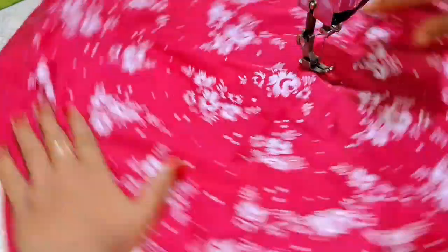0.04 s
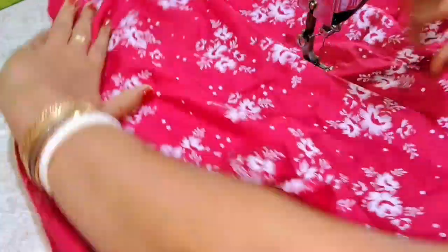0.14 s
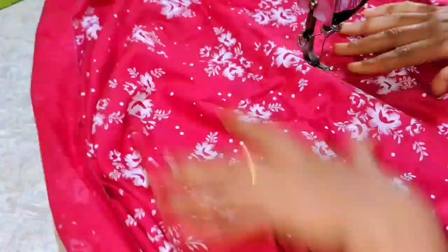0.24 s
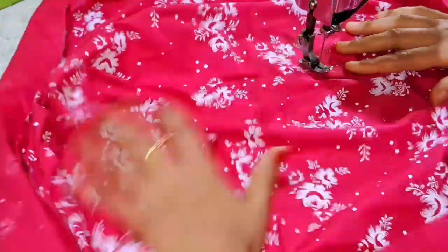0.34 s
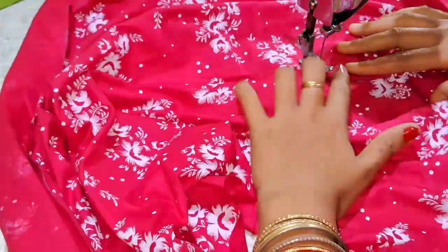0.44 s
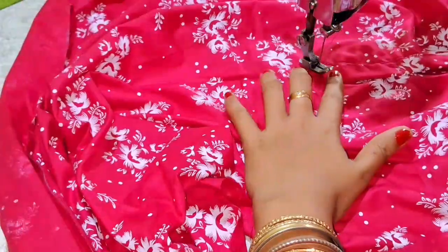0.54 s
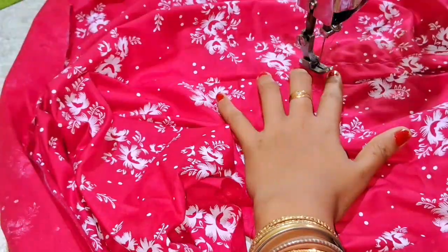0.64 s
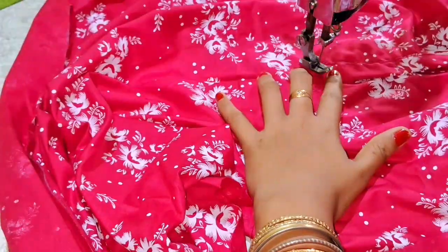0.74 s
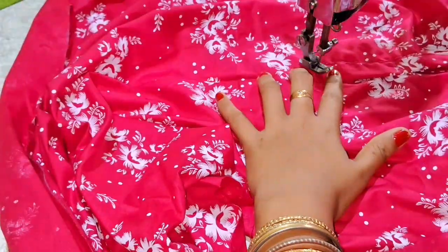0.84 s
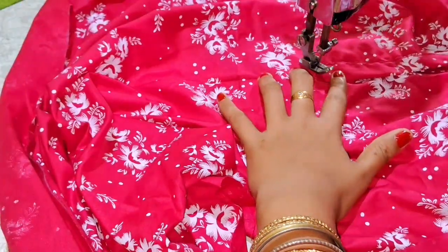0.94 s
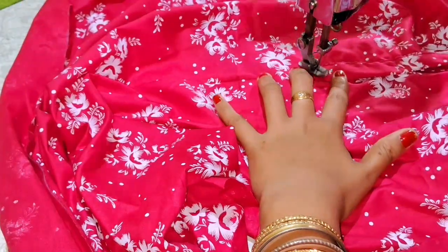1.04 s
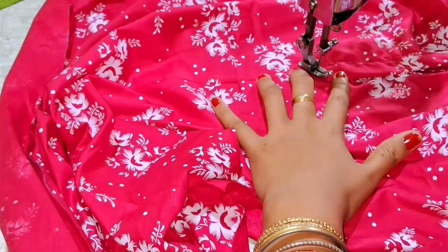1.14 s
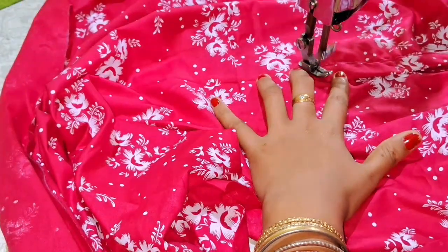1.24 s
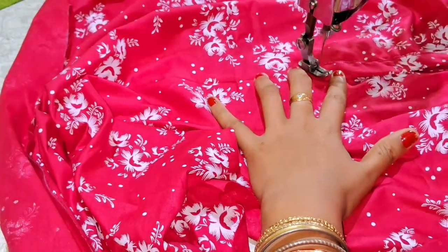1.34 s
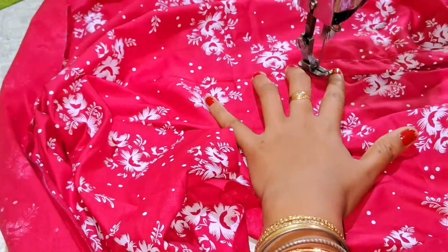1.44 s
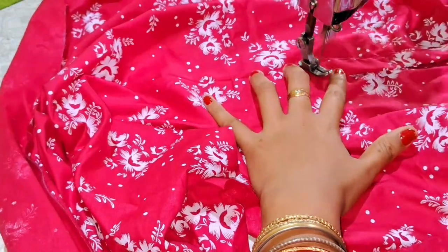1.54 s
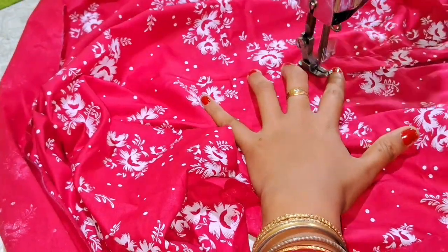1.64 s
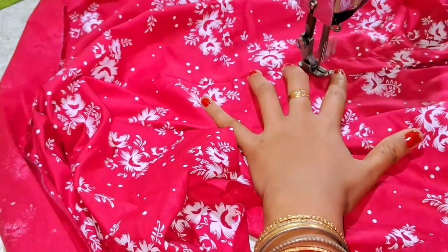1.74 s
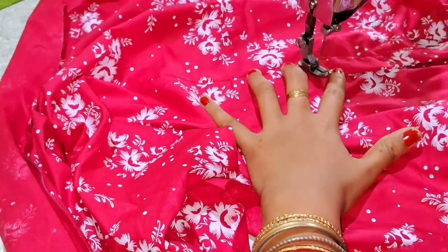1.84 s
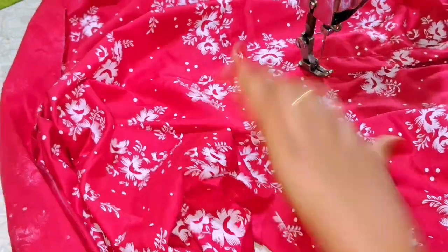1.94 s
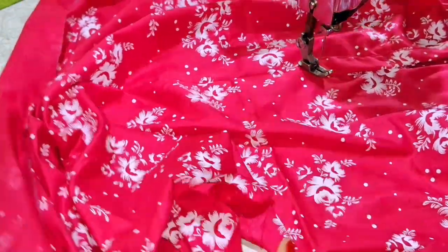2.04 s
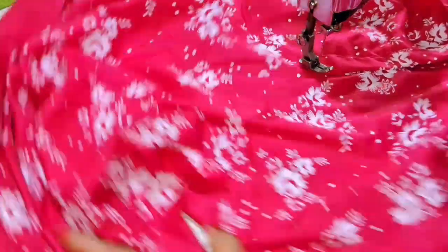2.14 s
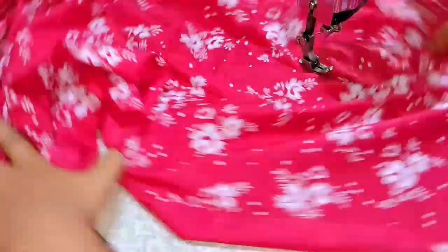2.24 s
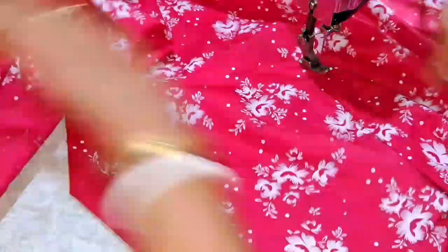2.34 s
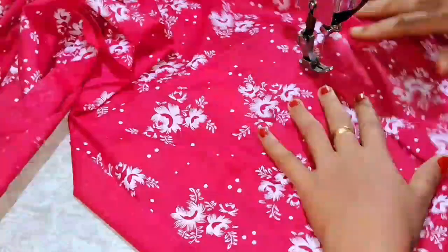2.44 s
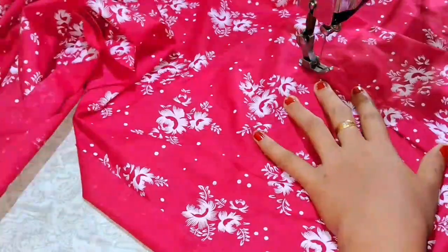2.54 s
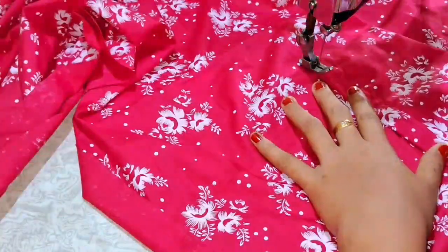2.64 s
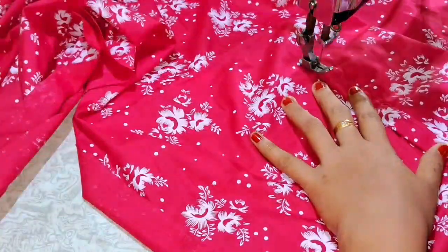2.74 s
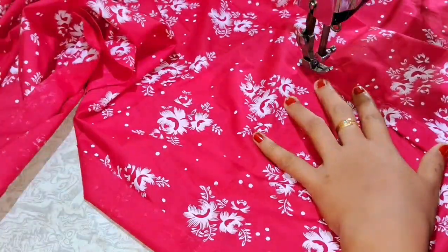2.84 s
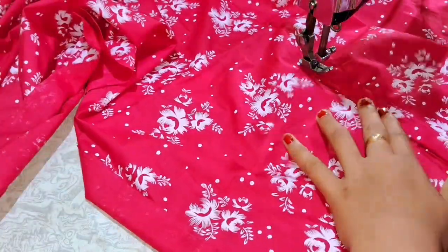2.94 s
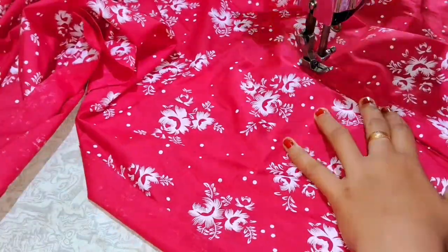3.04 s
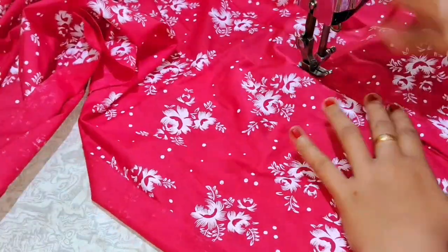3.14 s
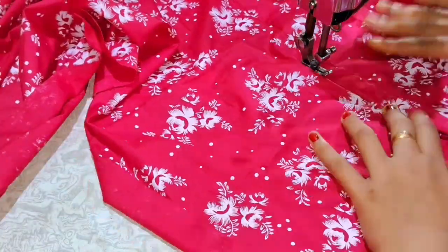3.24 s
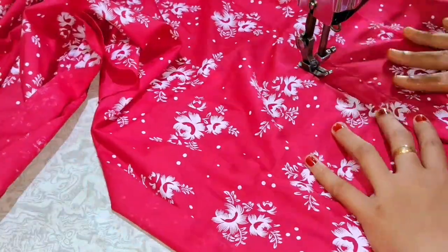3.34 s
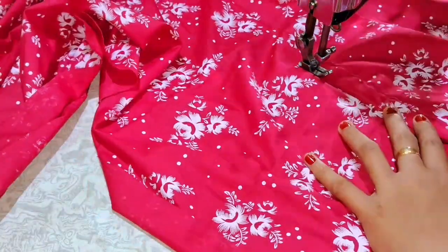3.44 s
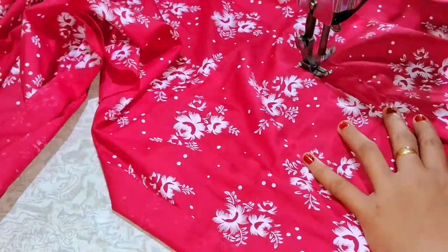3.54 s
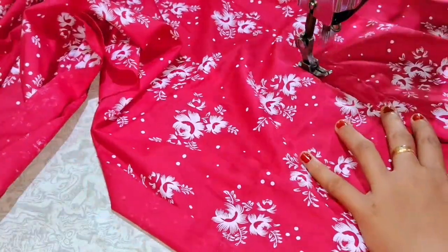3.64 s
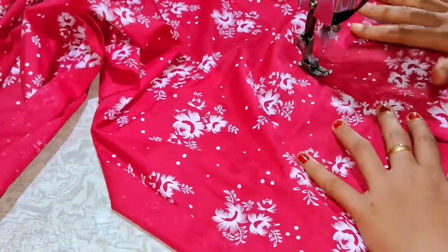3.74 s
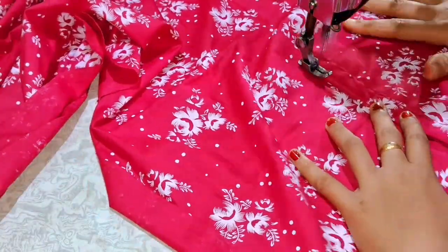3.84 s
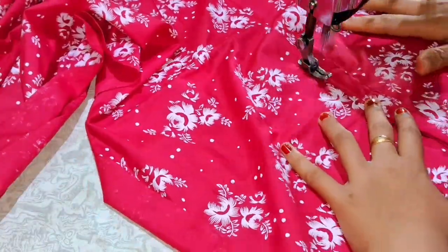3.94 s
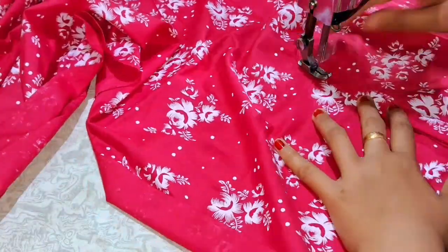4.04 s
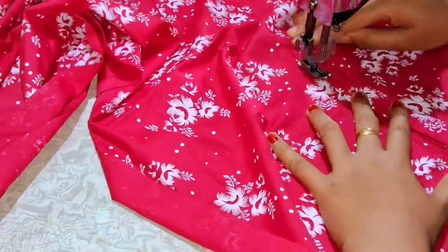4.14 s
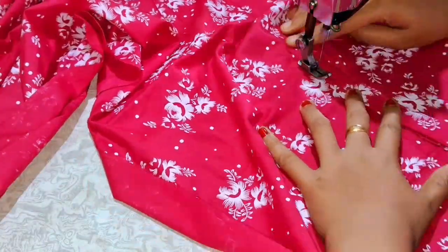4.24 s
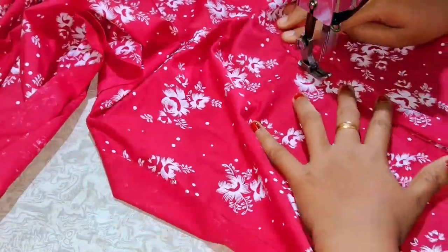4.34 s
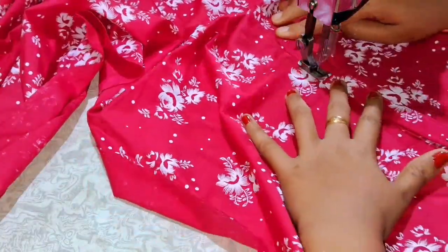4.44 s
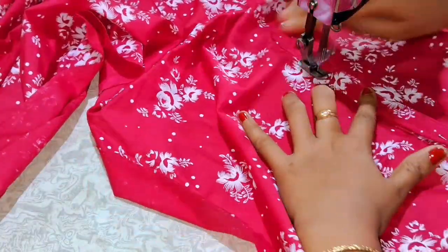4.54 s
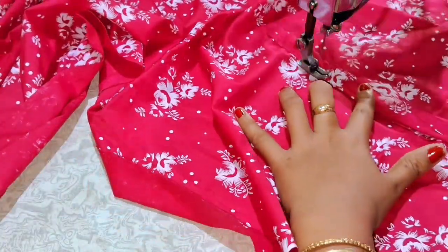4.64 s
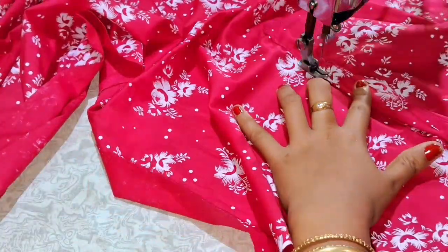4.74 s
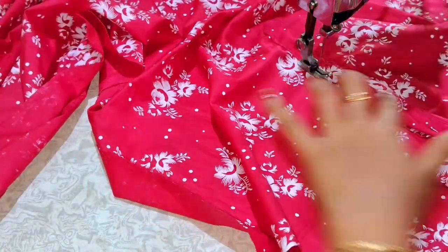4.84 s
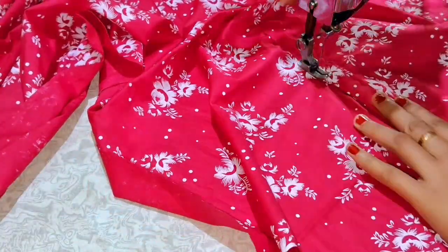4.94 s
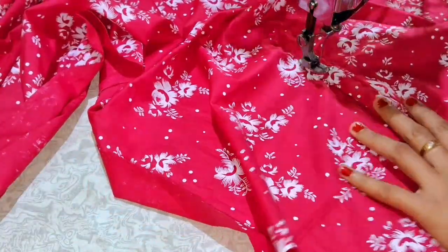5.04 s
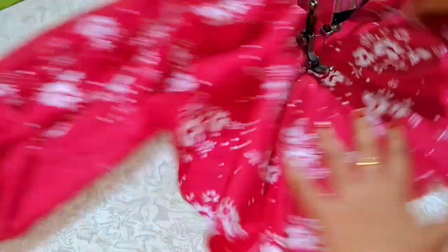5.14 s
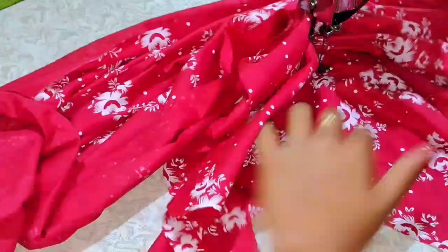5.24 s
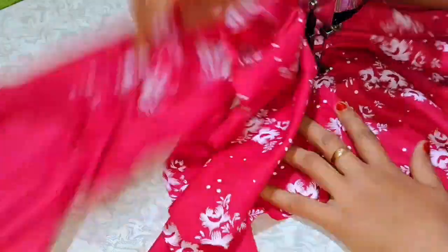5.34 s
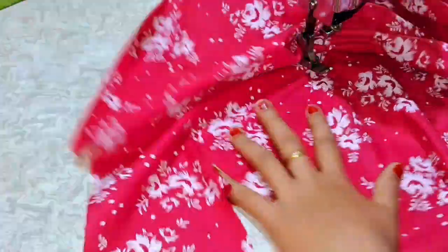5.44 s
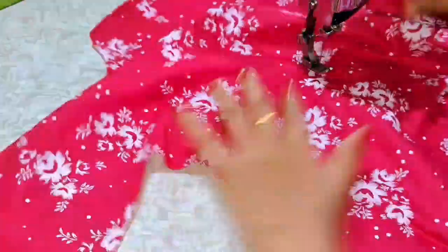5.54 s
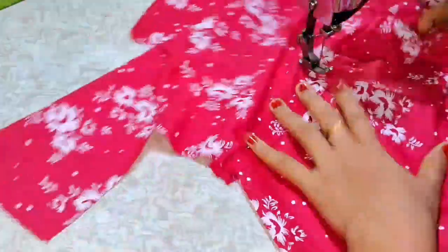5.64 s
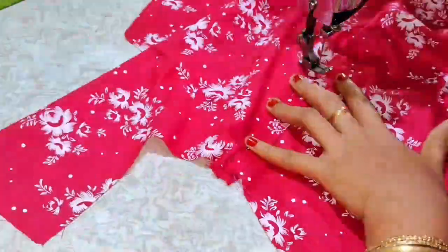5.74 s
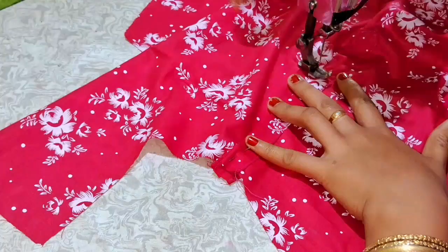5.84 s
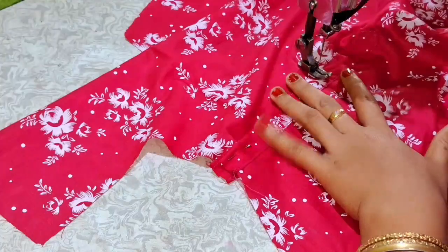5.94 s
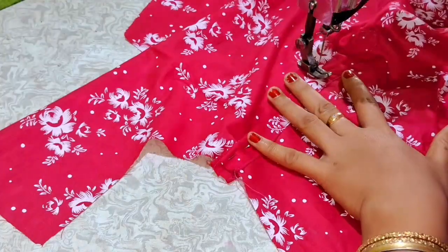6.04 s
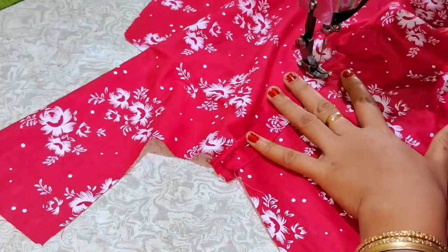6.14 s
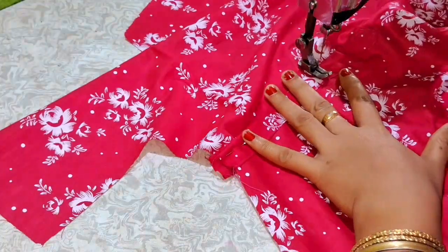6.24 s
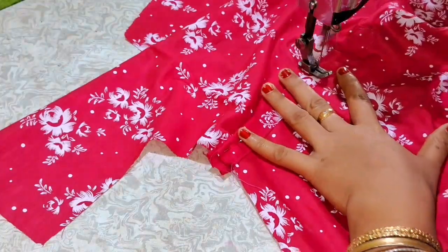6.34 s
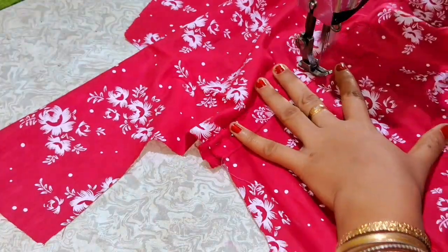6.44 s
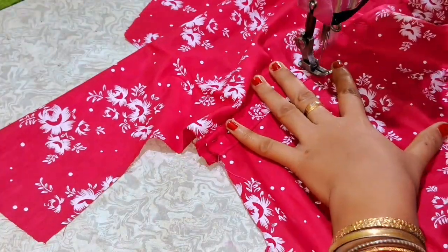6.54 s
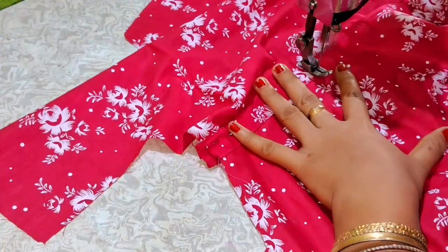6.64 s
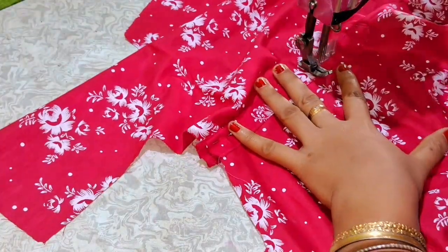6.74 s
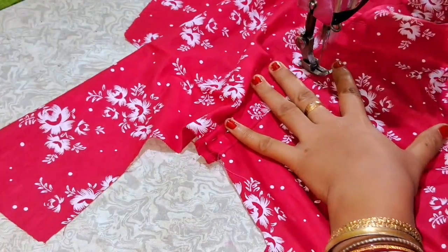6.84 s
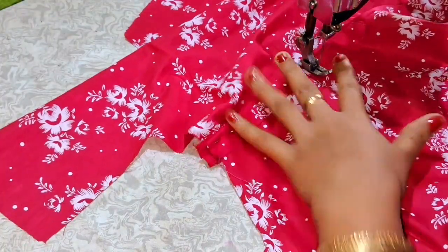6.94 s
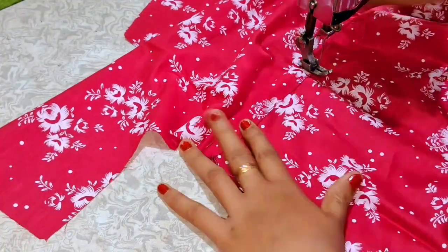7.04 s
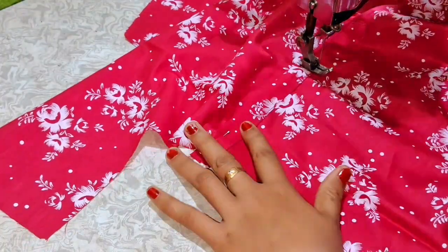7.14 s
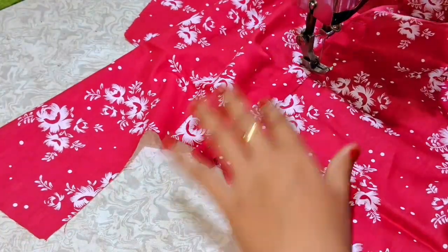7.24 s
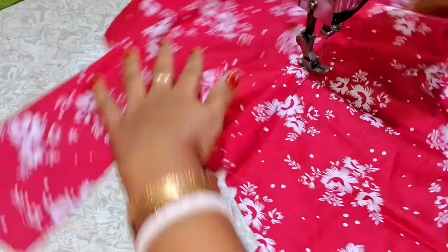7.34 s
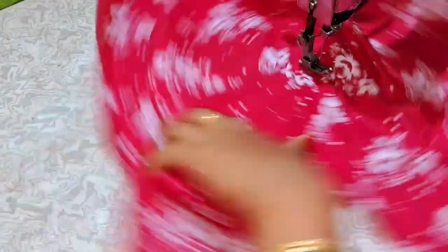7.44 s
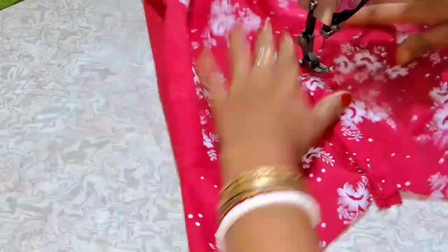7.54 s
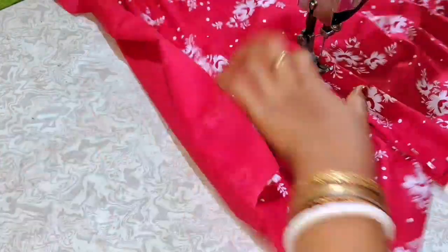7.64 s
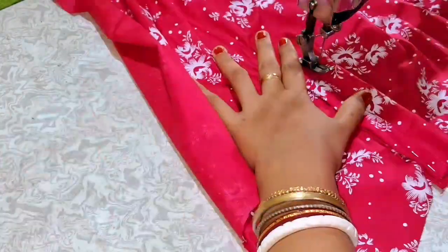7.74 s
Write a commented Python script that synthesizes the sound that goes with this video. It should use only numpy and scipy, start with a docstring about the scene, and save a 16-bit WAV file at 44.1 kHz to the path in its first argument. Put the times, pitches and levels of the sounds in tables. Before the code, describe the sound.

Hands drag and scuff cloth beside a sewing machine, then it rattles through a brief burst of stitching. More rustling, a lever click and a longer, louder burst follow. Fabric is flipped and smoothed with soft bumps, a third burst runs with a small squeak, and a sharp click precedes final cloth handling. Close microphone, quiet room, almost mono.

```python
"""Sewing machine in three bursts

A sewing machine stitches on its table, in a nearly mono picture. Noise bursts through resonances make the steel clicks
and body knocks, beating grit makes the rattle, decaying sines make table thuds and bangle tinkles, and swelling
resonant noise makes belt squeaks. Around the bursts, shaped noise and grit are hands dragging and scuffing the cloth.
"""
import sys
import numpy as np
from scipy import signal
from scipy.fft import rfft, irfft, next_fast_len
from scipy.io import wavfile
from scipy.ndimage import uniform_filter1d, map_coordinates

SR = 44100
rng = np.random.default_rng(int(sys.argv[2]) if len(sys.argv) > 2 else 0)


def unload_audio(sound):
    """Save the sound as a 16-bit wav file, at the path given as the first command line argument."""
    columns = np.transpose(np.atleast_2d(sound))
    # keep every value between -1 and 1, then stretch to whole-number steps
    steps = np.round(np.clip(columns, -1, 1) * 32767)
    wavfile.write(sys.argv[1], SR, steps.astype(np.int16))


N = 344089  # length in samples


def amp(db):
    """dB to gain."""
    return 10 ** (np.asarray(db) / 20)


def unit(x):
    """x at rms 1."""
    return x / np.sqrt(np.mean(x ** 2) + 1e-20)


def filtered(x, response):
    """x times a complex response of frequency, padded so that tails do not wrap round."""
    m = next_fast_len(N + SR // 2)
    return irfft(rfft(x, m) * response(np.fft.rfftfreq(m, 1 / SR)), m)[..., :N]


def colour(points):
    """Gain curve through (Hz, dB) points on a log frequency axis."""
    f, db = np.transpose(points)
    return lambda hz: amp(np.interp(np.log(hz + 1), np.log(f + 1), db))


def even_colour(points):
    """The same curve scaled to rms 1 over frequency, so white noise keeps its level."""
    return lambda hz: unit(colour(points)(hz))


def resonant(modes):
    """Causal response of (Hz, width in Hz, dB) modes in alternating polarity; white noise keeps its rms."""
    def response(f):
        h = 0
        for k, (centre, width, db) in enumerate(modes):
            damping = 1j * f * width
            h = h + (-1) ** k * amp(db) * damping / (centre * centre - f * f + damping)
        return h / np.sqrt(np.mean(np.abs(h) ** 2))
    return response


def gains(tables):
    """One gain per sample for each of the two dB columns, silent between the tables."""
    t = np.arange(N) / SR
    parts = [np.transpose(rows) for rows in tables]
    return [sum(amp(np.interp(t, p[0], p[k], -200, -200)) for p in parts) for k in (1, 2)]


def wobble(rate):
    """A smooth random curve, rate knots a second."""
    knots = rng.standard_normal(int(N * rate / SR) + 4)
    return map_coordinates(knots, [np.arange(N) * rate / SR])


def grit(rate, spread_db, hiss):
    """Random tiny impacts, rate a second and uneven in size, on a bed of hiss, rms 1."""
    places = rng.random(N) < rate / SR
    sizes = amp(spread_db * rng.exponential(size=N))
    hits = places * sizes * rng.standard_normal(N)
    return unit(unit(hits) + hiss * rng.standard_normal(N))


def add(track, s, sound):
    """Mix a sound in at s seconds."""
    i = max(round(s * SR), 0)
    track[i:i + len(sound)] += sound[:len(track) - i]


def blows(rows, modes, t60, rise, snap, focus_db, luck_db):
    """Noise bursts (s, dB, Hz) with snap and tail, returned rung by the modes (most near that Hz) and bare."""
    rung, bare, t = np.zeros(N), np.zeros(N), np.arange(SR // 4) / SR
    hz = np.fft.rfftfreq(len(t), 1 / SR)
    tail = amp(-60 * t / t60) * (1 - np.exp(-t / rise))
    shape = tail / tail.max() + snap * amp(-60 * t / 0.002)  # the snap falls 60 dB in 2 ms
    for s, db, spot_hz in rows:
        burst = amp(db) * shape * rng.standard_normal(len(t))
        luck = rng.normal(0, luck_db, len(modes))
        struck = []
        for (centre, width, level), v in zip(modes, luck):
            octaves_off = abs(np.log2(centre / spot_hz))
            struck.append((centre, width, level + v - focus_db * octaves_off))
        add(rung, s, irfft(rfft(burst) * resonant(struck)(hz), len(t)))
        add(bare, s, burst)
    return rung, bare


def room():
    """Faint air noise: white noise through a fixed colour."""
    # Each row: frequency in Hz, relative gain in dB.
    air_points = [(15, -39), (25, -24.5), (133, -16.5), (240, -29), (314, 13), (434, -13), (1000, -4.5),
                  (1240, -25), (3950, -50.5), (15600, -16)]
    return amp(-82) * unit(filtered(rng.standard_normal(N), colour(air_points)))


def patchy(x, depth_db):
    """Random patches of gain that move in time and frequency."""
    z = signal.stft(x, nperseg=512)[2]
    field = uniform_filter1d(rng.standard_normal(z.shape), size=7, axis=0)
    field = uniform_filter1d(field, size=9, axis=1)
    return signal.istft(z * amp(depth_db * unit(field)), nperseg=512)[1][:N]


def cloth():
    """Folds rub low down and rustle in grains above; a low hum near 312 Hz rises and falls with the rub."""
    # Drag over the table, one list per pause. Each row: time in seconds, low rub in dB, rustle in dB.
    drags = [
        [(0.0, -49.5, -59), (0.11, -61.5, -59), (0.2, -62, -60.5), (0.262, -69.5, -63.5), (0.324, -63, -58.5),
         (0.386, -84, -72.5), (0.548, -73, -85), (0.654, -70, -81), (1.008, -79.5, -73), (1.1, -80, -83),
         (1.18, -60.5, -79)],
        [(1.85, -68, -80), (1.892, -74, -61.5), (2.01, -63.5, -63), (2.138, -68, -63), (2.294, -66.5, -63),
         (2.418, -72.5, -73.5), (2.658, -66.5, -79), (2.796, -70.5, -82), (3.056, -59.5, -66),
         (3.264, -73.5, -77), (3.45, -69.5, -84), (3.55, -62, -68.5)],
        [(4.74, -64.5, -63.5), (4.898, -72, -71.5), (5.008, -69, -70), (5.14, -59, -60.5), (5.306, -57.5, -60),
         (5.468, -51.5, -56), (5.596, -82, -72.5), (5.686, -65.5, -85), (5.816, -59.5, -65), (5.914, -73, -76),
         (5.98, -82, -85)],
        [(6.87, -67, -63), (7.002, -60.5, -66.5), (7.126, -72.5, -71.5), (7.424, -64, -61.5),
         (7.538, -65, -61.5), (7.8, -70, -74)],
    ]
    # Colours of the rub and the rustle. Each row: frequency in Hz, relative gain in dB.
    rub_points = [(24, -49), (40, -16), (162, -8.5), (281, 0.5), (336, 4.5), (1400, -12), (1820, -80),
                  (3080, -120)]
    rustle_points = [(530, 7), (900, 10.5), (1240, 8), (2510, 9.5), (2800, 5), (4620, 2.5), (7900, -8.5),
                     (9920, -19.5), (15600, -13.5)]
    # Hum modes. Each row: frequency in Hz, width in Hz, relative level in dB.
    hum_modes = [(157, 26, -3), (312.4, 14, 4.5)]
    rub, rustle = gains(drags)
    folds, unsteadiness = amp(1.8 * wobble(35)), amp(3 * wobble(10))
    lumpy = amp(6.3 * wobble(25)) * rng.standard_normal(N)
    low = unit(filtered(lumpy, colour(rub_points)))
    hum = filtered(unsteadiness * rng.standard_normal(N), resonant(hum_modes))
    grains = filtered(folds * grit(900, spread_db=2.5, hiss=1.9), colour(rustle_points))
    high = unit(patchy(grains, depth_db=4.0))
    return rub * (low + 0.51 * hum) + rustle * high


def swells():
    """Hands and folds on the cloth: lumpy noise in one broad band that rises and fades."""
    # Each row: time of the top in seconds, level in dB, centre of the band in Hz.
    swell_rows = [(0.027, -59, 158), (0.251, -56, 147), (0.397, -69, 1940), (.53, -62.5, 400),
                  (0.603, -70, 1890), (0.62, -42.5, 338), (.65, -46, 232), (0.779, -67, 1750),
                  (.96, -69, 1830), (2.412, -63, 2030), (2.589, -61.5, 302), (2.641, -47.5, 360),
                  (2.758, -59, 310), (2.682, -45.5, 259), (5.148, -42.5, 367), (5.47, -51, 2600),
                  (5.481, -45.5, 1380), (5.571, -42.5, 380), (5.609, -57, 1520), (7.001, -65, 1600),
                  (7.1, -59, 910), (7.27, -67, 395), (7.541, -41, 470), (7.681, -42, 418),
                  (7.672, -56, 2150), (7.686, -48, 1120), (7.795, -47, 570)]
    # A firm swell is brief; each doubling_db softer lasts twice as long.
    firm_db, firm_width_s, doubling_db = -39, 0.0098, 21.5
    out, t = np.zeros(N), np.arange(-SR // 5, SR // 5) / SR
    hz = np.fft.rfftfreq(len(t), 1 / SR)
    for s, db, centre_hz in swell_rows:
        width = firm_width_s * 2 ** ((firm_db - db) / doubling_db)
        band = resonant([(centre_hz, .5 * centre_hz, 0)])(hz) ** 1.6
        lumps = amp(2.74 * rng.exponential(size=len(t))) * rng.standard_normal(len(t))
        puff = unit(irfft(rfft(lumps) * band)) * amp(db) * np.exp(-.5 * (t / width) ** 2)
        start = s + t[0]
        add(out, max(start, 0), puff[max(-round(start * SR), 0):])  # trims what falls before zero
    return out


def scuffs():
    """Fingers, rings and folds: each scuff is a quick, grainy brush of broad noise."""
    # Each row: start in seconds, level in dB.
    scuff_rows = [(0.2168, -38.5), (0.286, -48), (0.337, -55), (0.3694, -53), (1.032, -35.5), (1.113, -54),
                  (1.9375, -41), (1.962, -44), (2.407, -45.5), (2.5002, -63), (2.59, -61.5),
                  (2.7494, -66.5), (2.8626, -58.5), (3.0304, -57), (3.067, -46.5), (3.2615, -68),
                  (3.3364, -71), (3.47, -70), (4.95, -47), (5.1508, -43.5), (5.192, -55.5), (5.2515, -59),
                  (5.3777, -60), (5.475, -55), (5.5383, -55), (5.839, -52), (6.9516, -51), (7.215, -57),
                  (7.3382, -61), (7.534, -51)]
    # Each row: frequency in Hz, relative gain in dB.
    scuff_points = [(400, -7), (1500, -13), (3000, -3), (6000, -7.5), (10000, -16.5), (15700, -23.5)]
    t60_s, rise_s = 0.066, 0.0041
    envelope, t = np.zeros(N), np.arange(SR // 4) / SR
    for s, db in scuff_rows:
        add(envelope, s, amp(db - 60 * t / t60_s) * (1 - np.exp(-t / rise_s)))
    return filtered(envelope * grit(1900, spread_db=3.5, hiss=0.51), even_colour(scuff_points))


def body(rattle):
    """Blows and loose play shake the casting, part in its modes and part as a broad clatter."""
    # Blows on the cast body. Each row: start in seconds, level in dB, favoured ring in Hz.
    knocks = [(0.995, -43, 615), (1.034, -36.5, 970), (1.146, -51.5, 600), (1.2, -44, 1090),
              (1.335, -36, 740), (1.358, -39, 790), (1.405, -30, 647), (1.522, -27.5, 510),
              (1.609, -40, 972), (1.662, -29.5, 510), (1.687, -27.5, 546), (1.729, -27, 517),
              (1.789, -32, 630), (1.825, -45, 776), (1.988, -46.5, 1070), (3.075, -38, 980),
              (3.558, -31, 985), (3.626, -31, 545), (3.723, -29.5, 523), (3.864, -29.5, 1280),
              (3.885, -30, 525), (3.967, -27, 525), (4.034, -28.5, 735), (4.111, -31, 800),
              (4.145, -33, 546), (4.196, -27, 776), (4.264, -28.5, 970), (4.287, -22, 550),
              (4.358, -23.5, 570), (4.439, -25, 750), (4.509, -28.5, 527), (4.529, -26.5, 1010),
              (4.633, -37, 990), (4.671, -34.5, 780), (4.934, -47.5, 1000), (4.979, -32.5, 555),
              (5.121, -41.5, 515), (5.566, -44, 520), (5.804, -42.5, 530), (5.995, -48, 990),
              (6.025, -37, 530), (6.12, -36.5, 950), (6.217, -31.5, 940), (6.277, -36, 950),
              (6.318, -34, 950), (6.418, -30.5, 517), (6.449, -30, 626), (6.543, -25.5, 990),
              (6.586, -29.5, 486), (6.725, -33.5, 1130), (6.771, -26.5, 940), (6.813, -31, 980),
              (7.045, -46, 990), (7.147, -36.5, 1050), (7.574, -40.5, 850)]
    # Resonances of the casting. Each row: frequency in Hz, width in Hz, relative level in dB.
    body_modes = [(349, 114, -8), (548.2, 33.3, 1), (654, 86, -12), (764, 73, -4), (988.4, 24.6, -4.5),
                  (1130, 38, -4.5), (1590, 420, -19.5)]
    # Colour of the clatter. Each row: frequency in Hz, relative gain in dB.
    clatter_points = [(35, -58), (60, -36), (129, 0.5), (248, -6.5), (522, -1.5), (892, -14.5), (1000, 6.5),
                      (1210, -7), (3690, -14), (8930, -31), (15600, -97)]
    rung, bare = blows(knocks, body_modes, t60=0.078, rise=0.0028, snap=3.8, focus_db=13.5, luck_db=9.5)
    play = amp(2 * wobble(40))
    loose = rattle * play * grit(500, spread_db=1.0, hiss=1.5)
    broad = filtered(amp(-10) * bare + amp(-3.0) * loose, even_colour(clatter_points))
    return amp(-6.0) * rung + amp(1.5) * filtered(loose, resonant(body_modes)) + broad


def table():
    """Each thud is a few cycles of the table top, roughened by the frame."""
    # Each row: start in seconds, level in dB, pitch in Hz.
    thuds = [(1.009, -45.5, 123), (1.287, -46, 144), (1.42, -40.5, 144), (1.475, -36, 136),
             (1.577, -35.5, 179), (1.657, -39, 142), (2.03, -44.5, 157), (2.404, -51, 157),
             (2.619, -45.5, 148), (3.254, -60.5, 160), (3.773, -43, 140), (3.82, -44, 152),
             (3.853, -47, 133), (3.937, -37, 144), (4.009, -35, 149), (4.081, -43, 158),
             (4.401, -37.5, 150), (4.508, -33, 124), (4.933, -49, 149), (4.972, -49, 112),
             (5.562, -39.5, 163), (5.814, -40, 146), (6.04, -42, 137), (6.233, -39, 148), (6.413, -32, 128),
             (6.461, -36, 116), (6.587, -33.5, 146), (6.627, -38, 132), (6.692, -40, 150),
             (6.819, -47, 134), (7.531, -45, 153), (7.696, -51, 170)]
    t60_s, rise_s = 0.075, 0.0072
    out, t = np.zeros(N), np.arange(SR // 6) / SR
    shape = amp(-60 * t / t60_s) * (1 - np.exp(-t / rise_s))
    for s, db, hz in thuds:
        add(out, s, amp(db) * shape / shape.max() * np.sin(2 * np.pi * hz * t))
    return out * (1 + .5 * wobble(150))


def steel(rattle):
    """Contacts and loose play ring the small steel parts; each contact also leaves a broad snap."""
    # Contacts of needle bar, hook and presser lever.
    # Each row: start in seconds, level in dB, favoured ring in Hz.
    clicks = [(1.034, -30, 3900), (1.293, -33.5, 2960), (1.3558, -21.5, 1730), (1.4023, -33, 1670),
              (1.4355, -27.5, 3260), (1.476, -23.5, 2260), (1.5214, -24, 2940), (1.5358, -27, 2250),
              (1.572, -28, 3060), (1.6563, -33, 3030), (1.6801, -28.5, 3030), (1.7089, -22, 3870),
              (1.7915, -29.5, 2250), (1.8269, -29, 2960), (2.0765, -31.5, 1910), (2.4078, -41, 4710),
              (3.0656, -38.5, 3860), (3.5218, -42.5, 2430), (3.5555, -44, 1620), (3.57, -30, 3510),
              (3.6353, -24, 2450), (3.8145, -30, 3460), (3.8457, -25, 2890), (3.8605, -25, 3740),
              (3.877, -25, 3400), (3.8986, -26.5, 2990), (3.9335, -28.5, 4230), (3.9525, -20.5, 2060),
              (4.1091, -23, 3070), (4.145, -24.5, 1660), (4.1956, -20, 3060), (4.2612, -19, 3270),
              (4.3415, -19.5, 3040), (4.3857, -29, 2990), (4.4007, -23, 4190), (4.4198, -20, 3130),
              (4.4828, -22.5, 3660), (4.5097, -27, 2990), (4.5213, -21, 3290), (4.6013, -19, 3680),
              (4.6511, -29, 3480), (4.6881, -27.5, 2960), (4.9677, -32.5, 1610), (5.475, -33, 1600),
              (5.7958, -42, 2010), (6.118, -31, 3700), (6.2098, -41, 3690), (6.2292, -34, 3710),
              (6.4323, -29, 3720), (6.448, -28, 3600), (6.4752, -22.5, 3660), (6.493, -25.5, 3700),
              (6.542, -25.5, 3700), (6.5856, -23, 2970), (6.6686, -42, 3240), (6.7111, -24.5, 3940),
              (6.727, -27, 3700), (6.747, -26, 3680), (6.7725, -29.5, 3470), (6.815, -25, 1630),
              (7.1254, -37, 3450), (7.1454, -17.5, 1880), (7.5762, -37, 2370), (7.7267, -39.5, 3520)]
    # Resonances of the steel parts. Each row: frequency in Hz, width in Hz, relative level in dB.
    steel_modes = [(1750, 170, -6), (2190, 290, -1.5), (3010, 146, 2), (3404, 306, 1.5), (3995, 396, -2.5),
                   (4413, 46, 2.5), (4410, 640, -14), (6080, 160, -10.5)]
    # Colour of the snap. Each row: frequency in Hz, relative gain in dB.
    snap_points = [(500, 3.5), (1500, 5), (3500, -5), (6000, -8.5), (9000, -25), (12000, -45.5),
                   (15700, -46.5)]
    ring, bare = blows(clicks, steel_modes, t60=.04, rise=0.00049, snap=0.81, focus_db=7.5, luck_db=3.5)
    play = amp(3 * wobble(70))
    loose = rattle * play * grit(790, spread_db=2.5, hiss=0.79)
    broad = filtered(bare, even_colour(snap_points))
    return amp(-10.0) * ring + filtered(loose, resonant(steel_modes)) + amp(-15.0) * broad


def bangles():
    """Each touch rings the modes briefly at new strengths."""
    # Each row: start in seconds, level in dB.
    touches = [(1.0789, -70), (1.1154, -70), (1.8941, -63.5), (2.3491, -55.5), (3.049, -61),
               (3.1203, -64.5), (4.557, -54.5), (5.1826, -78), (5.257, -68), (5.4266, -59.5)]
    # Bangle modes. Each row: frequency in Hz, relative level in dB, time to fall 60 dB in seconds.
    bangle_modes = [(3950, -2, .03), (4750, -4, .04), (7800, 2, .08), (9800, -12, .04), (12800, 0, .07)]
    out, t = np.zeros(N), np.arange(SR // 5) / SR
    for s, db in touches:
        luck = rng.normal(0, 4, len(bangle_modes))
        ring = 0
        for (hz, level, t60), v in zip(bangle_modes, luck):
            ring = ring + amp(level + v - 60 * t / t60) * np.sin(2 * np.pi * hz * t)
        add(out, s, amp(db) * ring * (1 - np.exp(-t / 0.0013)))
    return out * (1 + .5 * wobble(120))


def beat():
    """Gain of the rattle: it jumps at every stroke and sinks until the next."""
    # One row per burst: time of one stroke in seconds, seconds between strokes, sink between strokes in dB.
    beats = [(1.522, .0432, 9), (4.267, 0.074, 4.5), (6.583, 0.052, 4.5)]
    t = np.arange(N) / SR
    nearest = np.argmin([abs(t - row[0]) for row in beats], axis=0)
    s, period, sink_db = np.array(beats)[nearest].T
    phase = (t - s) / period % 1
    return amp(uniform_filter1d(sink_db * (.5 - phase), size=SR // 100))  # jumps softened over 10 ms


def belt():
    """A slip swells and fades in a few high resonances."""
    # Each row: time of the top in seconds, level in dB.
    squeaks = [(1.713, -33.5), (6.311, -31)]
    # Each row: frequency in Hz, width in Hz, relative level in dB.
    squeak_modes = [(2605, 83, 7.5), (4874, 120, 9), (5300, 154, 9), (5586, 45, 16), (7400, 600, -10.5),
                    (11070, 130, -7.5)]
    width_s = 0.01
    t = np.arange(N) / SR
    swell = sum(amp(db) * np.exp(-.5 * ((t - s) / width_s) ** 2) for s, db in squeaks)
    return filtered(swell * rng.standard_normal(N), resonant(squeak_modes))


def scene():
    """Machine near the centre, hands and room slightly right, a faint noisy left-right difference added."""
    # Running mechanism, one list per burst. Each row: time in seconds, body rattle in dB, steel rattle in dB.
    running = [
        [(1.17, -68, -76), (1.25, -54, -59), (1.596, -47.5, -54), (1.7, -46, -46), (1.78, -45, -52),
         (1.85, -80, -65)],
        [(3.55, -55, -65), (3.732, -49.5, -50), (4.05, -42, -46), (4.51, -43.5, -44.5), (4.7, -52, -62),
         (4.74, -65, -62)],
        [(5.97, -65.5, -86), (6.05, -53.5, -63), (6.19, -62.5, -65), (6.23, -49.5, -56), (6.4, -46, -49),
         (6.648, -42, -44.5), (6.83, -49.5, -50.5), (6.87, -66, -75)],
    ]
    low, high = gains(running) * beat()
    hands = bangles() + cloth() + swells() * amp(1.8 * wobble(90)) + scuffs() + room()
    mid = steel(high) + body(low) + table() + belt() + hands
    difference_colour = colour([(100, -7.0), (400, -23), (1500, -15.0), (4000, -15.5), (12000, 8.5)])
    difference = wobble(60) * filtered(mid, difference_colour)
    lean = amp(-32) * hands
    side = amp(-57.5) * difference - lean
    return np.array([mid + side, mid - side])  # left, right


def record(dry):
    """The microphone thins both ends; nothing is kept above the band limit."""
    # Microphone colour. Each row: frequency in Hz, gain in dB.
    mic_points = [(25, -29), (90, 2), (10000, -1), (15700, -20.5)]
    top_hz = 15770
    return filtered(dry, lambda hz: colour(mic_points)(hz) * (hz < top_hz))


dry = scene()
out = record(dry)
unload_audio(out)
```